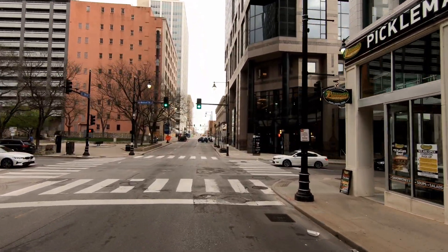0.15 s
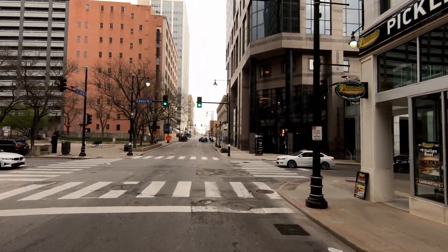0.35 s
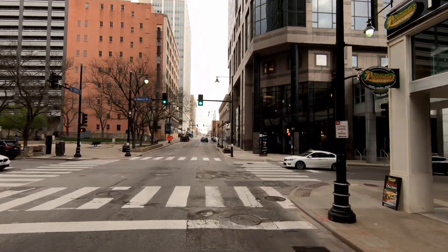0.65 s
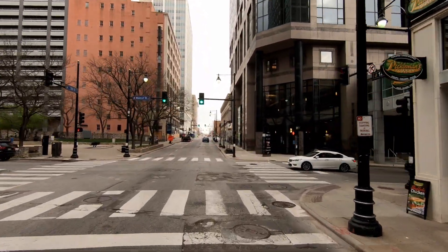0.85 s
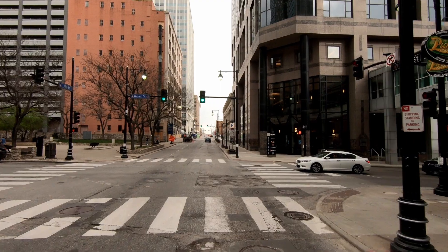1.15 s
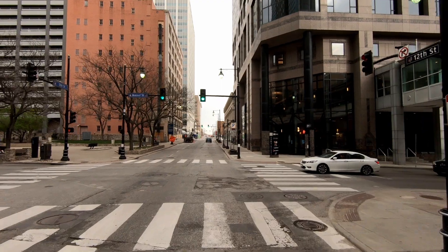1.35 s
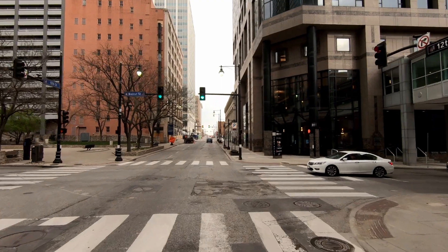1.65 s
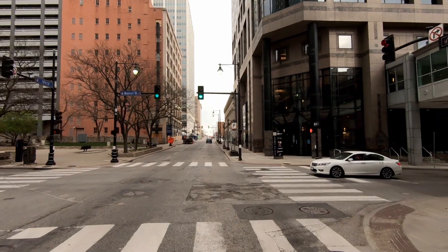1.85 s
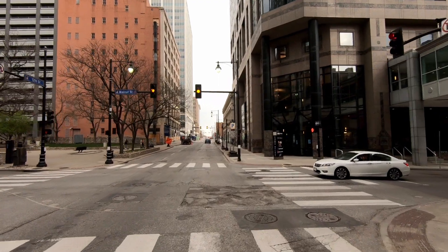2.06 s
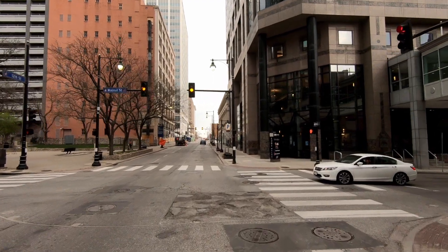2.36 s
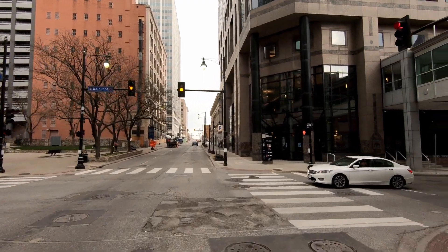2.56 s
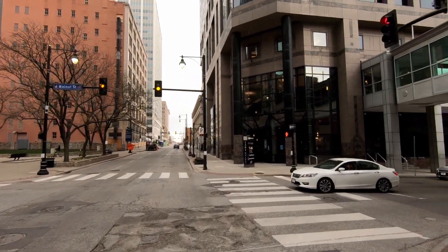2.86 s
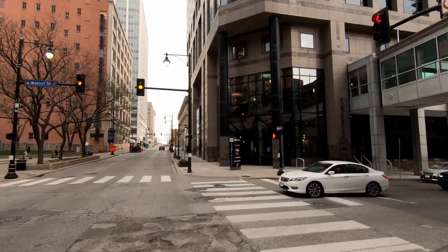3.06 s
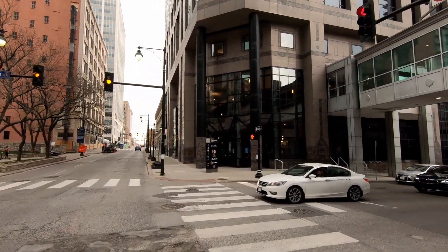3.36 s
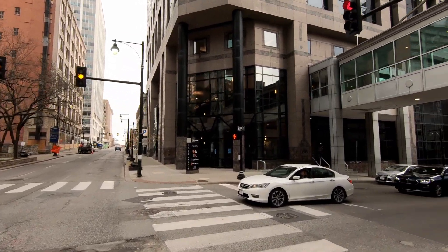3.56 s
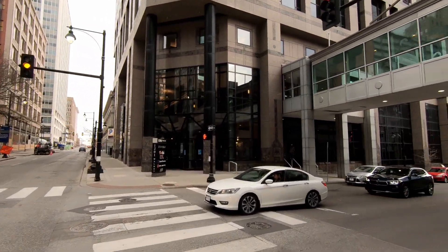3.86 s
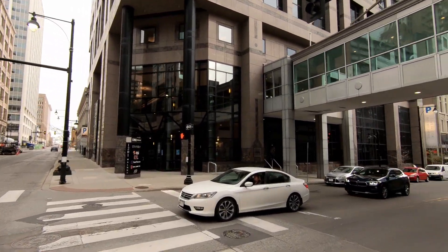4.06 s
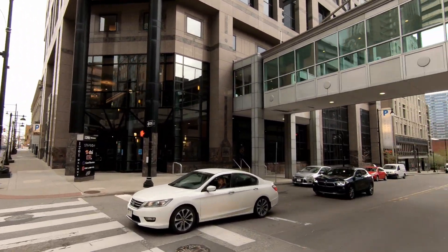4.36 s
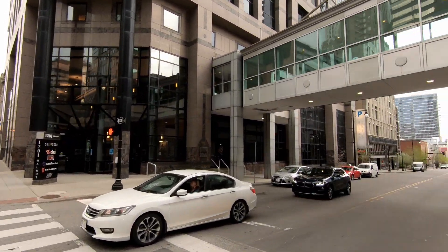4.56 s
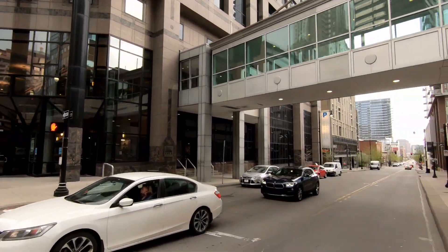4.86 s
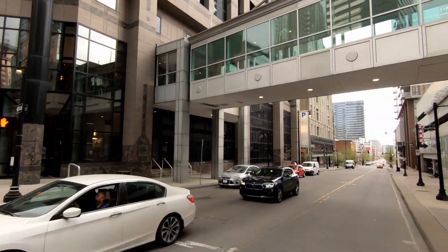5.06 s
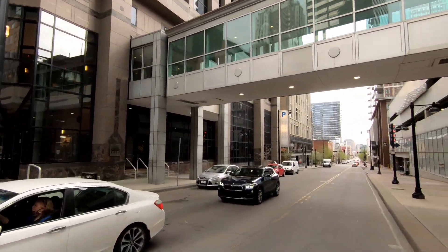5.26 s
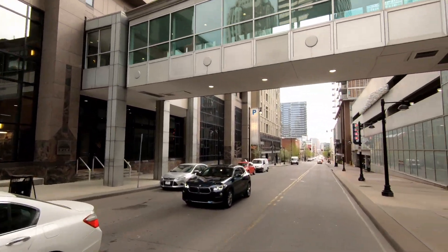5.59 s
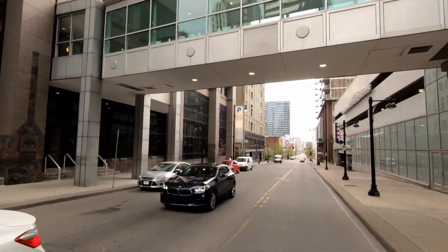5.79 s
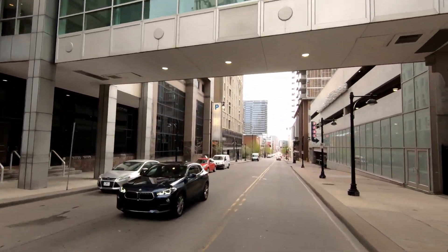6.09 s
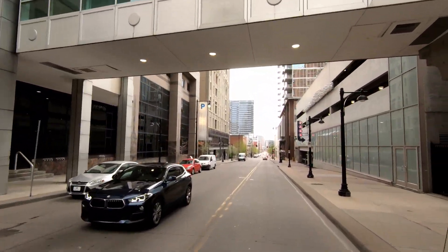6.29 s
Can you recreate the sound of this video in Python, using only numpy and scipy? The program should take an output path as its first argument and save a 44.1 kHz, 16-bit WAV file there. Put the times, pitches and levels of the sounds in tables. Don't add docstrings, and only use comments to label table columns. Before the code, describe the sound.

A continuous, dull wash of street traffic and moving air between tall walls, in mono. Low wind thuds strike the microphone, becoming frequent and strong after the middle. One brief, faint horn beep rings out with a short echo tail around halfway. Late on, close by, a tiny squeak and a quick plastic clatter of the mount, then a final heavy gust.

```python
import sys
import numpy as np
from scipy import signal
from scipy.io import wavfile
from scipy.ndimage import uniform_filter1d

SR = 44100
rng = np.random.default_rng(int(sys.argv[2]) if len(sys.argv) > 2 else 0)


def file_out(sig):
    cols = np.atleast_2d(sig).T
    lim = np.clip(cols, -1, 1)
    pcm = np.round(lim * 32767).astype(np.int16)
    wavfile.write(sys.argv[1], SR, pcm)


def linear_from_db(decibels):
    return 10 ** (np.asarray(decibels, float) / 20)


N = 283563

# frequency in Hz, density in dB per Hz.
HISS_SPECTRUM = [(1700, -25.5), (2300, -1.5), (2600, -1.5), (3100, -3.5), (3600, -2.5), (4050, -1.5),
                 (4600, -7), (5000, -10.5), (6000, -44.5)]
# frequency in Hz, density in dB per Hz.
FIZZ_SPECTRUM = [(4000, -30), (4900, -2.5), (5400, -1), (6400, -1.5), (6900, -6.5), (7400, -13.5),
                 (8000, -14.5), (8600, -21.5), (9300, -29), (10000, -44), (10600, -70.5)]
# frequency in Hz, density in dB per Hz.
JET_SPECTRUM = [(11200, -43), (11900, -2), (12600, 3), (13600, -4), (14300, -7), (14900, -33)]
# time in seconds, level in dB above calm.
DRAUGHT = [(0, 1), (2.14, -1.5), (2.2, 3.5), (2.6, -1), (4.45, -1.5), (4.6, 2), (5.2, 0.5), (5.5, 3.5),
           (6.43, 5.5)]
# start in seconds, end in seconds, level in dB.
VENT_OPENINGS = [
    (-.5, 2.52, -94),
    (2.52, 2.76, -99),
    (2.76, 3.1, -94),
    (4.55, 6.01, -96),
]
# frequency in Hz, density in dB per Hz.
HUM_SPECTRUM = [(60, -12), (130, -3.5), (210, -0.5), (330, -6), (480, -2.5), (650, -8.5), (900, -19),
                (1500, -44)]
# frequency in Hz, density in dB per Hz.
ROAR_SPECTRUM = [(400, -34.5), (640, -4.5), (850, 0), (1050, -1), (1250, -4.5), (1500, -23.5), (2200, -41)]
# frequency in Hz, density in dB per Hz.
WHIR_SPECTRUM = [(850, -25.5), (1250, -4), (1400, -1), (1700, -3.5), (1980, -4.5), (2250, -13), (2600, -17),
                 (3500, -49)]
# time in seconds, engine level in dB, tyre level in dB.
TRAFFIC = [(0, 0.5, -0.5), (1.5, 2, 0), (2.3, -2, 0.5), (2.85, -3, 0), (3.1, -6, -1), (4.2, -3, -1.5),
           (5.0, 1, -2), (5.6, -5, -2.5), (6.43, -6, -6)]
# multiple of the reed pitch, level in dB, extra fall in dB per second.
HORN_OVERTONES = [(1, 5, -8), (2, 0, 6), (3, -5, 8), (4, -5, -8), (5, -2, -3), (6, 0, 10), (7, -13, 5),
                  (8, -18, 10), (9, -14, 10)]
# middle in seconds, length in seconds, pitch in Hz, width in Hz, level in dB.
WHINES = [
    (1.25, .45, 1787, 12, -59.5),
    (1.3, .5, 1960, 12, -65),
    (1.93, .4, 1955, 12, -61),
    (3.4, .5, 1947, 12, -65),
    (1.2, 1.4, 798, 12, -57),
    (2.6, 1.1, 800, 12, -57),
    (3.4, .5, 800, 12, -58),
    (4.7, .9, 800, 12, -57),
]
# middle in seconds, length in seconds, pitch in Hz, width in Hz, level in dB.
SQUEAKS = [
    (3.072, .03, 5750, 450, -67),
    (3.182, .018, 5550, 450, -64),
    (5.77, .02, 6270, 900, -63),
    (5.928, .035, 6200, 600, -61),
    (5.929, .03, 12300, 400, -82),
    (5.942, .012, 13300, 700, -82),
]
# time in seconds, blow level in dB, ring level in dB.
RATTLE_TICKS = [
    (5.9907, -38, -30),
    (6.0027, -24, -17),
    (6.0082, -33, -30),
    (6.0122, -27, -12),
    (6.0145, -28, -12),
    (6.0215, -38, -26),
]
# frequency in Hz, width in Hz, level in dB.
MOUNT_BODY = [(1500, 2500, 2), (3800, 3500, 2), (6200, 3000, -4), (9500, 3000, -15), (13000, 2500, -32)]
# frequency in Hz, width in Hz, level in dB.
MOUNT_RINGS = [(8100, 250, -1), (9860, 300, -5)]
# middle in seconds, length in seconds, level in dB.
SCUFFS = [
    (2.3, .3, -72),
    (3.08, .04, -72),
    (5.931, 0.046, -56),
    (6.006, 0.073, -56),
]
# frequency in Hz, density in dB per Hz.
SCUFF_SPECTRUM = [(1500, -12.5), (3000, 1.5), (4500, 2), (7000, -5.5), (9500, -22.5), (11000, -45),
                  (12800, -34), (14500, -51)]
# time in seconds, peak level in dB.
MEMBRANE_SNAPS = [(2.9243, -93), (3.3962, -89), (3.7055, -86), (3.9988, -83), (4.9581, -94), (5.0394, -90),
                  (5.0893, -92), (5.3108, -89), (5.3398, -94), (5.6251, -79.5), (5.6974, -81),
                  (5.7718, -78), (5.9479, -81), (6.2068, -83), (6.2841, -87.5), (6.2841, -76.5),
                  (6.332, -80)]
# frequency in Hz, density in dB per Hz.
THUMP_SPECTRUM = [(6, -40.5), (14, -13.5), (24, -3), (34, 0.5), (46, 1), (58, -3), (75, -13), (110, -47),
                  (400, -120)]
# frequency in Hz, density in dB per Hz.
THROB_SPECTRUM = [(35, -36), (55, -9.5), (66, 1.5), (85, 0), (105, -7.5), (130, -21.5), (190, -48.5),
                  (600, -120)]
# frequency in Hz, density in dB per Hz.
FLUTTER_SPECTRUM = [(70, -31), (102, -5), (120, 2), (160, -7.5), (210, -10), (270, -14.5), (420, -26.5),
                    (900, -61.5), (3000, -120)]
# time in seconds, level in dB.
BREEZE = [(0, -41.5), (1.15, -43), (1.5, -38), (1.9, -39), (2.5, -37), (2.85, -34.5), (3.2, -30.5),
          (3.45, -38.5), (3.55, -40.5), (4.0, -39.5), (4.3, -42), (4.85, -43), (5.15, -31.5), (5.38, -36.5),
          (5.65, -32.5), (5.9, -34.5), (6.1, -33), (6.43, -22.5)]
# middle in seconds, length in seconds, large-eddy level in dB, smaller eddies in dB above it.
BUFFETS = [(0.284, .06, -31.5, -8), (.4, 0.085, -33.5, -9), (0.977, 0.12, -38, -4), (2.014, 0.079, -42, 10),
           (2.227, 0.084, -28, -3), (2.36, .08, -38, -10), (2.641, 0.059, -24.5, -19),
           (2.955, 0.058, -23, -16), (3.008, .08, -28, -20), (3.14, 0.08, -30.5, -12),
           (3.303, 0.055, -25.5, -8), (3.417, 0.085, -24, -14), (3.679, 0.086, -29, -2),
           (3.807, 0.056, -28, -6), (4.005, 0.11, -34, 5.5), (4.17, 0.14, -32.5, -7),
           (4.53, 0.057, -31.5, -3.5), (4.66, 0.17, -33, -4), (5.042, .07, -27.5, -6),
           (5.168, 0.12, -32.5, 0), (5.453, 0.042, -21.5, -12), (5.552, 0.078, -23.5, -11),
           (5.629, 0.065, -23, -2.5), (5.707, 0.046, -20.5, 0), (5.781, 0.067, -21, -7),
           (5.954, 0.053, -24, -5), (6.03, 0.14, -27.5, 5), (6.212, .06, -36, -7),
           (6.299, 0.044, -28.5, 7.5), (6.387, 0.074, -16.5, -7.5)]


def evened(x):
    return x / np.sqrt(np.mean(x ** 2) + 1e-20)


def steadied(x, length_s):
    power = abs(uniform_filter1d(x ** 2, round(length_s * SR))) + .05
    return evened(x / power ** 0.21)


def column(rows, index):
    table = np.array(rows)
    return np.interp(np.arange(N) / SR, table[:, 0], table[:, index])


def swell(middle_s, length_s):
    return np.exp(-.5 * ((np.arange(N) / SR - middle_s) / (length_s / 3)) ** 2)


def noise(spectrum, size, patchy_db, flicker_db):
    frames = 2 * N // size + 3
    hz = np.fft.rfftfreq(size, 1 / SR)
    real, imag, patches = rng.standard_normal((frames, len(hz), 3)).T
    patches = uniform_filter1d(patches, size=9, axis=0)
    patches = evened(uniform_filter1d(patches, size=5, axis=1))
    flicker = rng.standard_normal(frames)
    table_hz, table_db = np.transpose(spectrum)
    shape_db = np.interp(np.log(hz + 1), np.log(table_hz + 1), table_db, left=-150, right=-150)
    level_db = shape_db[:, None] + patchy_db * patches + flicker_db * flicker
    z = (real + 1j * imag) * linear_from_db(level_db)
    return evened(signal.istft(z, window="cosine", nperseg=size)[1][:N])


def resonate(x, hz, width_hz):
    turn = np.exp(2j * np.pi * hz * np.arange(len(x)) / SR)
    pole = np.exp(-np.pi * width_hz / SR)
    smooth = signal.lfilter([1 - pole], [1, -pole], x / turn + 1e-18)
    return 2 * (turn * smooth).real


def lull():
    start_s, depth_db, recovery_s = 6.04, -4, 0.33
    since_s = np.arange(N) / SR - start_s
    drop = np.clip(since_s / .02, 0, 1)
    return linear_from_db(depth_db * drop * np.exp(-np.maximum(since_s, 0) / recovery_s))


def air():
    hiss_db, hiss_follows, fizz_db = -58, .2, -67.5
    edge_s, leak_db = .05, -120
    draught_db = column(DRAUGHT, index=1)
    t = np.arange(N) / SR
    hiss = noise(HISS_SPECTRUM, size=512, patchy_db=0.8, flicker_db=-0.06)
    hiss = hiss * linear_from_db(hiss_db + hiss_follows * draught_db) * lull()
    fizz = noise(FIZZ_SPECTRUM, size=512, patchy_db=1.35, flicker_db=.5)
    fizz = fizz * linear_from_db(fizz_db + draught_db) * lull() ** 0.26
    valve = linear_from_db(leak_db)
    for start_s, end_s, db in VENT_OPENINGS:
        valve = valve + linear_from_db(db) * (np.tanh((t - start_s) / edge_s) - np.tanh((t - end_s) / edge_s)) / 2
    jet = noise(JET_SPECTRUM, size=512, patchy_db=2.0, flicker_db=1.3) * valve
    return hiss + fizz + jet


def street():
    hum_db, roar_db, whir_db, whir_follows = -41, -45, -50.5, 0.29
    engines_db, tyres_db = column(TRAFFIC, index=1), column(TRAFFIC, index=2)
    hum = noise(HUM_SPECTRUM, size=2048, patchy_db=0.87, flicker_db=0.0) * linear_from_db(hum_db + engines_db)
    roar = noise(ROAR_SPECTRUM, size=2048, patchy_db=0.13, flicker_db=-0.6) * linear_from_db(roar_db + tyres_db)
    whir = noise(WHIR_SPECTRUM, size=1024, patchy_db=0.86, flicker_db=0.4)
    whir = whir * linear_from_db(whir_db + whir_follows * tyres_db)
    return hum + (roar + whir) * lull() ** .4


def horn():
    start_s, reed_hz, horn_db = 3.268, 571, -53.5
    attack_s, hold_s = .008, .05
    echo_db, echo_fall_db_per_s, echo_s = -7, 13, .47
    sag, sag_s = .015, .01
    wall_cycles, wall_db = 13.417, 1
    at = round(start_s * SR)
    since_s = np.arange(SR) / SR
    direct = np.minimum(since_s / attack_s, 1)
    echo = linear_from_db(echo_db - echo_fall_db_per_s * since_s) * (since_s < echo_s)
    level = np.where(since_s < attack_s + hold_s, direct, echo)
    level = uniform_filter1d(level, size=260, mode="constant")
    level = uniform_filter1d(level, size=260) * np.tanh(since_s / .006) ** 2
    scattered = .2 + 1.1 * np.clip(since_s / .012 - 4.5, 0, 1)
    cycle_s = since_s - sag * sag_s * np.exp(-since_s / sag_s)
    out = np.zeros(N)
    for multiple, db, fall_db_per_s in HORN_OVERTONES:
        a, b = signal.resample(rng.standard_normal((2, 36 * multiple)), SR, axis=1)
        paths = (1 + scattered * (a + 1j * b)) / np.sqrt(1 + 2 * scattered ** 2)
        tone = (paths * np.exp(2j * np.pi * multiple * reed_hz * cycle_s)).real
        out[at:at + SR] += linear_from_db(horn_db + db - fall_db_per_s * since_s) * level * tone
    return out + linear_from_db(wall_db) * np.roll(out, round(wall_cycles / reed_hz * SR))


def whines():
    out = np.zeros(N)
    for middle_s, length_s, hz, width_hz, db in WHINES + SQUEAKS:
        first = max(round((middle_s - length_s) * SR), 0)
        part = slice(first, round((middle_s + length_s) * SR))
        tone = rng.standard_normal(len(out[part]))
        tone = resonate(resonate(tone, hz, width_hz), hz, width_hz)
        out[part] += linear_from_db(db) * swell(middle_s, length_s)[part] * evened(tone)
    return out


def rattle():
    snap_s, snap_db, snap_hz = .016, -2, 8500
    blows, rung = np.zeros((2, N))
    for s, db, ring_db in RATTLE_TICKS:
        blows[round(s * SR)] = linear_from_db(db)
        rung[round(s * SR)] = linear_from_db(db + ring_db + 15)
    out = np.zeros(N)
    for k, (hz, width_hz, db) in enumerate(MOUNT_BODY):
        out += (-1) ** k * linear_from_db(db) * resonate(resonate(blows, hz, width_hz), hz, width_hz)
    for hz, width_hz, db in MOUNT_RINGS:
        out += linear_from_db(db) * resonate(resonate(rung, hz, width_hz), hz, 4 * width_hz)
    highpass = signal.butter(6, snap_hz, "high", fs=SR, output="sos")
    thin = signal.sosfilt(highpass, rng.standard_normal(N))
    snaps = thin * sum(linear_from_db(db + snap_db) * swell(s + snap_s / 3, snap_s) for s, db in MEMBRANE_SNAPS)
    rubbing = sum(linear_from_db(db) * swell(s, length_s) for s, length_s, db in SCUFFS)
    scuffs = rubbing * noise(SCUFF_SPECTRUM, size=256, patchy_db=2.5, flicker_db=2.2)
    return out + snaps + scuffs


def wind():
    calm_db, throb_db, throb_follows = -41, -42.5, 0.92
    flutter_db, flutter_follows, flutter_in_buffet_db = -42, 0.61, -8
    flutter_lag_s = 0.038
    breeze_db = column(BREEZE, index=1)
    throb_db = throb_db + throb_follows * (breeze_db - calm_db)
    flutter_db = flutter_db + flutter_follows * (breeze_db - calm_db)
    big_power, small_power = np.zeros((2, N))
    for middle_s, length_s, db, small_db in BUFFETS:
        gust_power = swell(middle_s, length_s) ** 2
        big_power += linear_from_db(2 * db) * gust_power
        small_power += linear_from_db(2 * (db + small_db)) * gust_power
    late_power = np.roll(small_power, round(flutter_lag_s * SR))
    late_power = late_power * (np.arange(N) > SR / 10) * linear_from_db(2 * flutter_in_buffet_db)
    thump = steadied(noise(THUMP_SPECTRUM, size=4096, patchy_db=-0.1, flicker_db=0.3), 0.048)
    throb = steadied(noise(THROB_SPECTRUM, size=4096, patchy_db=-1.26, flicker_db=-1.5), 0.045)
    flutter = steadied(noise(FLUTTER_SPECTRUM, size=2048, patchy_db=-0.43, flicker_db=-0.1), 0.077)
    thump = thump * np.sqrt(linear_from_db(breeze_db) ** 2 + big_power)
    throb = throb * np.sqrt(linear_from_db(throb_db) ** 2 + small_power)
    flutter = flutter * np.sqrt(linear_from_db(flutter_db) ** 2 + late_power)
    return thump + throb + flutter


def scene():
    return (air() + street() + horn() + whines() + rattle() + wind())[None]


def roll_off(x):
    return signal.sosfilt(signal.butter(12, 14730, fs=SR, output="sos"), x)


def record(dry):
    return roll_off(dry)


dry = scene()
out = record(dry)
file_out(out)
```